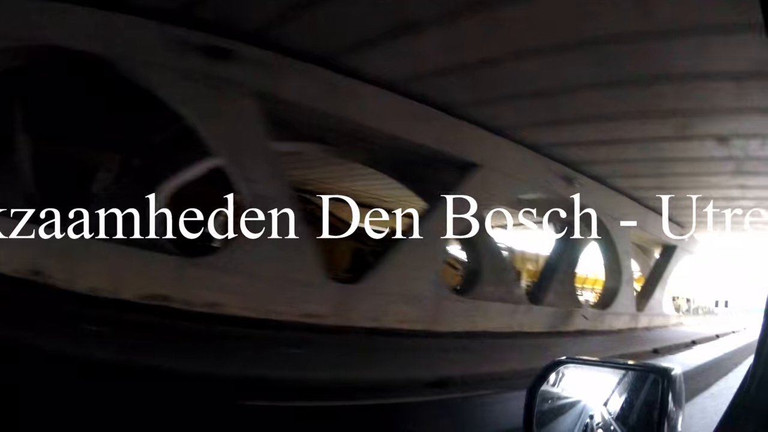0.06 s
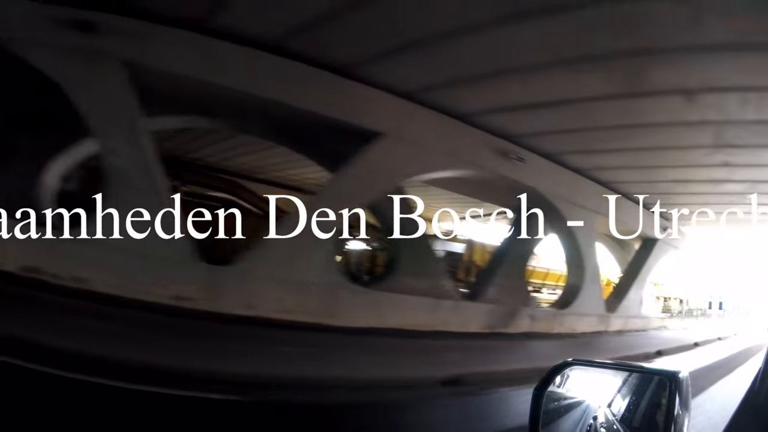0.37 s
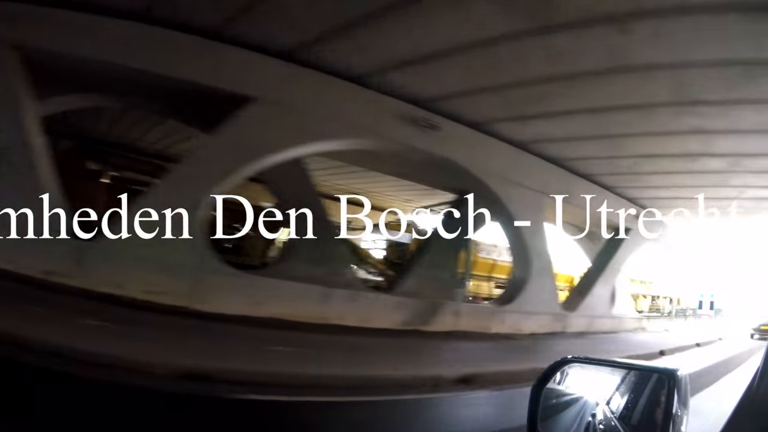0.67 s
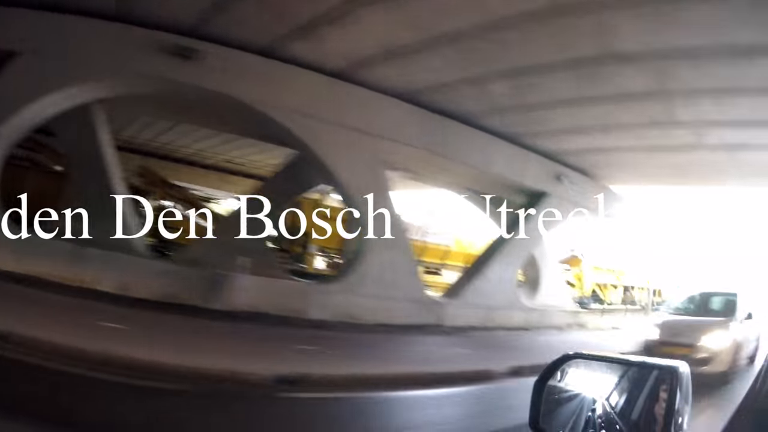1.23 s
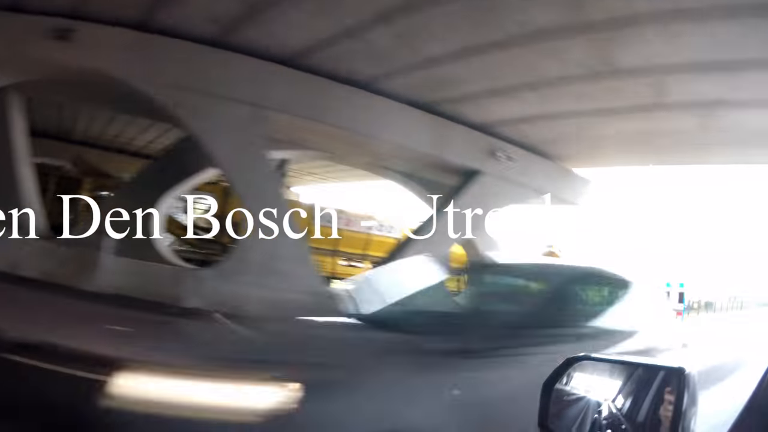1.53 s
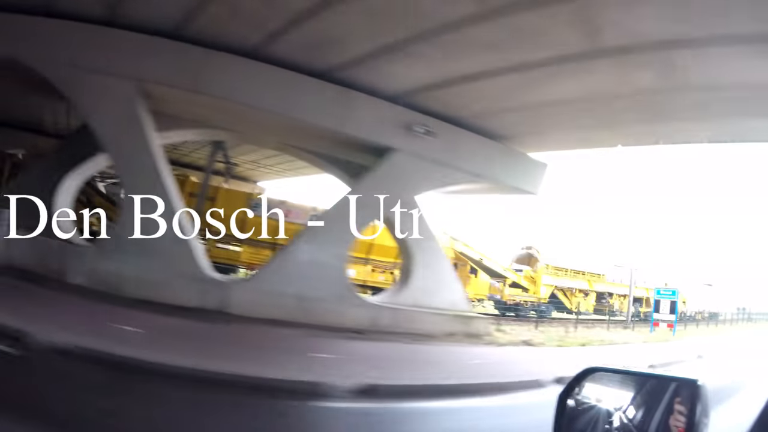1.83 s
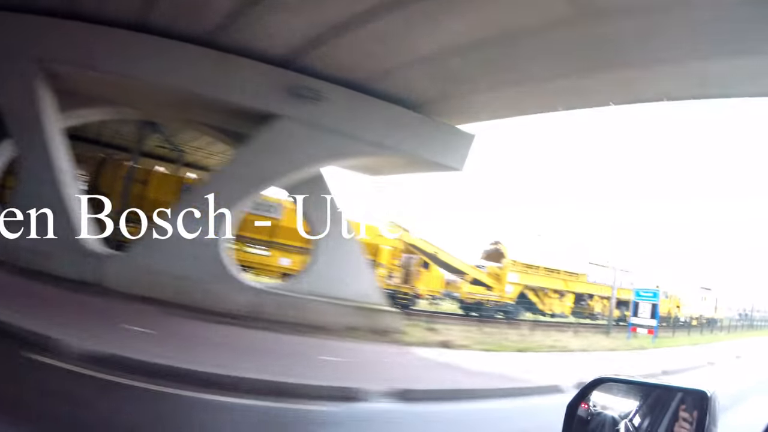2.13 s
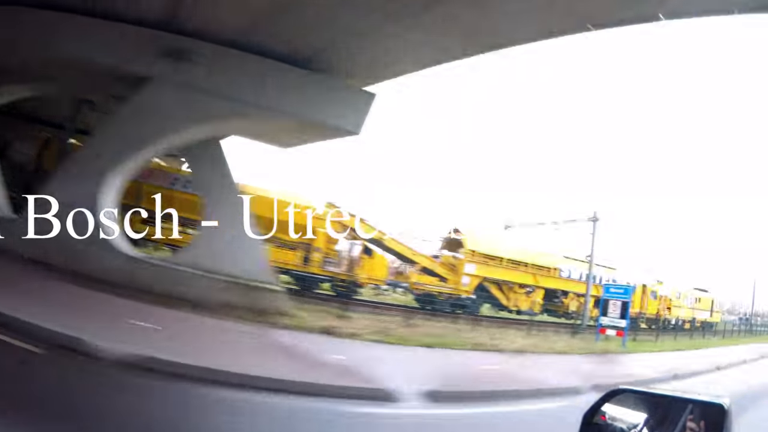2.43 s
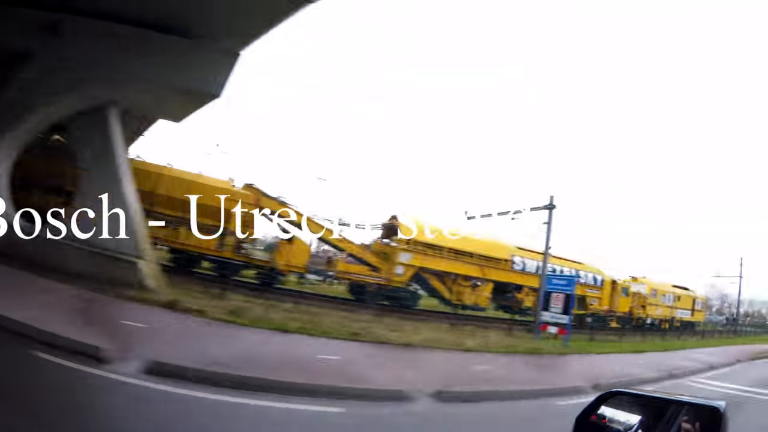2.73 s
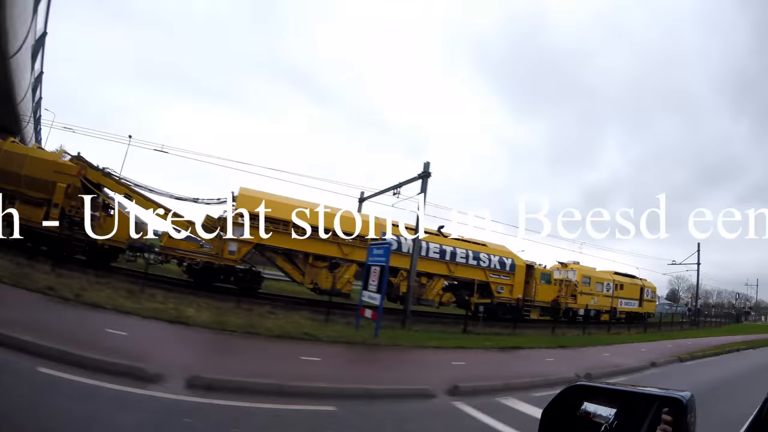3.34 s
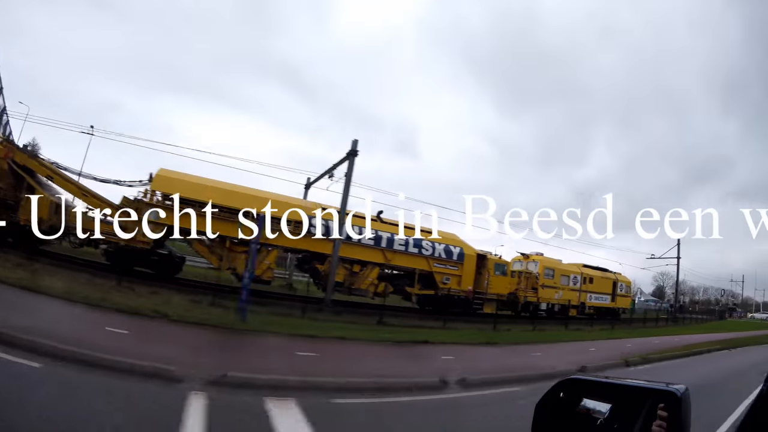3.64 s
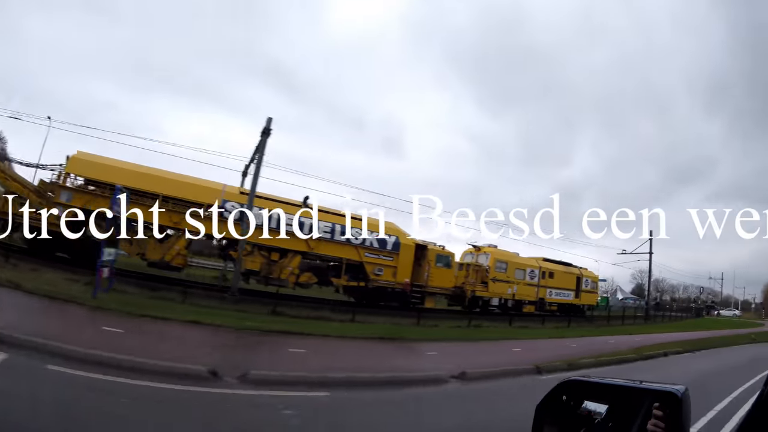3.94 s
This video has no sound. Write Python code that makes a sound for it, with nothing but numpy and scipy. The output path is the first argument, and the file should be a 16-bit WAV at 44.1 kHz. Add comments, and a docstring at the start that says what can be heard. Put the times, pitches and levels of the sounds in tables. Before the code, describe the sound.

Deep wind flutters on the microphone at a moving car's window, over tyre noise, low engine drone and a hollow roar under a bridge. At about 1.5 seconds an oncoming car whooshes past with a thump and a hiss of spray. Its wake pops and thumps until around 2.3 seconds. The roar falls away in the open, and wind, tyres and engine swell again from about 3.4 seconds.

```python
"""Driving out from under a bridge

At a car's side window, wind flutters on the microphone over tyre roar, air hiss and engine drone.
A concrete bridge throws the roar back until the car comes out into the open. An oncoming car
rushes past with a bow wave and a hiss of spray; the eddies of its wake thump and pop on the
microphone and push the limiter down."""
import sys
import numpy as np
from scipy import signal
from scipy.fft import rfft, irfft
from scipy.io import wavfile
from scipy.ndimage import uniform_filter1d, minimum_filter1d, map_coordinates

SR = 44100
rng = np.random.default_rng(int(sys.argv[2]) if len(sys.argv) > 2 else 0)


def master_out(mix):
    """Clip the mix to full scale and print it as 16-bit PCM to the path in sys.argv[1]."""
    frames = np.transpose(np.atleast_2d(mix))
    ceiling = np.clip(frames, -1, 1)
    pcm = np.round(ceiling * 32767).astype(np.int16)
    wavfile.write(sys.argv[1], SR, pcm)


N = 176400
T = np.arange(N) / SR
BURST_T = np.arange(-2048, 2048) / SR  # seconds around the centre of a short burst
PASS_S = 1.555  # the moment the oncoming car draws level


def amp(db):
    """Decibels to gain."""
    return 10 ** (np.asarray(db) / 20)


def unit(x):
    """Scales to rms 1."""
    return x / np.sqrt(np.mean(x ** 2) + 1e-20)


def level(points):
    """A fader ride: gain over time from rows of seconds and dB."""
    return amp(np.interp(T, *np.transpose(points)))


def colour(points, hz):
    """An EQ curve: gain at hz from rows of Hz and dB."""
    point_hz, db = np.transpose(points)
    return amp(np.interp(np.log(hz + 1), np.log(point_hz), db))


def noise(gain_at):
    """Noise of rms 1 with the given gain over frequency."""
    return unit(irfft(rfft(rng.standard_normal(N)) * gain_at(np.fft.rfftfreq(N, 1 / SR)), N))


def equalise(x, points):
    """Runs a sound through an EQ curve."""
    return irfft(rfft(x) * colour(points, np.fft.rfftfreq(N, 1 / SR)), N)


def rush(points, patchy_db, flicker_db):
    """Coloured noise with drifting patches and a flicker shared by all bands."""
    _, _, bands = signal.stft(rng.standard_normal(N), SR, nperseg=1024, noverlap=768)
    patches = uniform_filter1d(rng.standard_normal(bands.shape), size=8, axis=0)
    patches = unit(uniform_filter1d(patches, size=14, axis=1))
    flicker = unit(uniform_filter1d(rng.standard_normal(bands.shape[1]), size=5))
    bands *= amp(patchy_db * patches + flicker_db * flicker)
    _, restless = signal.istft(bands, nperseg=1024, noverlap=768)
    return unit(equalise(restless[:N], points))


def burst(window, gains):
    """A puff of noise under the window, evened out so that it fills its spectrum without holes."""
    puff = rng.standard_normal(len(window)) * window
    for _ in range(3):
        phases = np.exp(1j * np.angle(rfft(puff)))
        puff = irfft(phases * gains, len(window)) * np.sqrt(window)
    return unit(puff) * np.sqrt(np.mean(window ** 2))


def add(mix, centre_s, sound):
    """Mixes a sound in, centred on the given time."""
    part = mix[max(round(centre_s * SR) - len(sound) // 2, 0):][:len(sound)]
    part += sound[:len(part)]


# Gusts on the microphone. Each row: time in seconds, level in dB.
WIND_RIDE = [(0, -13.5), (.45, -11), (1.0, -12), (1.55, -11), (1.7, -14), (1.88, -7.5), (2.02, -16.5),
             (2.46, -16.5), (2.66, -19.5), (2.78, -19), (2.87, -27.5), (2.96, -16), (3.4, -16),
             (3.65, -12.5), (4, -14)]
# Their sub-heavy tone. Each row: frequency in Hz, gain in dB.
WIND_EQ = [(5, -9), (14, -2), (24, 4), (36, 0.5), (56, -8.5), (75, -15), (100, -22), (200, -39), (400, -57),
           (1500, -101.5)]


def wind(lull_s=1.622, lull_half_s=.05, lull_db=-12):
    """Deep airstream flutter, its big swings evened out; the passing car's body briefly shelters it."""
    flutter = noise(lambda hz: colour(WIND_EQ, hz))
    swing = uniform_filter1d(abs(signal.hilbert(flutter)), size=2600)
    shelter = amp(lull_db * np.exp(-((T - lull_s) / lull_half_s) ** 4))
    return level(WIND_RIDE) * shelter * unit(flutter / swing)


# Our own car's road noise. Each row: time in seconds, level in dB.
TYRE_RIDE = [(0, -28), (1.9, -33), (2.4, -39.5), (2.75, -36), (3.2, -33.5), (3.45, -30), (3.7, -28.5),
             (4, -27)]
# Its dark tone. Each row: frequency in Hz, gain in dB.
TYRE_EQ = [(40, 8), (130, 4), (220, 2), (330, -1.5), (500, -7.5), (780, -9), (1000, -7.5), (1220, -13),
           (1600, -13), (2200, -22.5), (3200, -29.5), (4300, -40), (6500, -44), (11000, -52.5),
           (15000, -61)]


def tyre_roar():
    """The car's own tyres and airflow, heard directly."""
    return level(TYRE_RIDE) * rush(TYRE_EQ, patchy_db=.5, flicker_db=.56)


# Air at the window. Each row: time in seconds, level in dB.
HISS_RIDE = [(0, -46.5), (.18, -46), (.45, -45), (1.05, -48.5), (1.6, -47.5), (1.87, -47), (2.0, -51.5),
             (2.17, -60.5), (2.42, -62.5), (2.52, -60), (2.66, -62), (3.0, -59), (3.6, -59), (4, -61.5)]
# Its thin, bright tone. Each row: frequency in Hz, gain in dB.
HISS_EQ = [(800, -20), (2600, 3.5), (4100, -2), (5000, 0), (6000, -8), (8000, -17.5), (10500, -26),
           (15000, -32.5)]


def window_hiss():
    """Air hissing along the side window."""
    return level(HISS_RIDE) * rush(HISS_EQ, patchy_db=.8, flicker_db=.3)


# The engine's swells. Each row: time in seconds, level in dB.
DRONE_RIDE = [(0, -25), (.35, -31.5), (.8, -32.5), (1.3, -40.5), (2.0, -40.5), (2.5, -38.5), (3.2, -52),
              (3.65, -27.5), (4, -38.5)]


def engine_drone(centre_hz=141, width_oct=.28):
    """The engine, blurred into one low band of noise."""
    drone = noise(lambda hz: np.exp(-.5 * (np.log2((hz + 1) / centre_hz) / width_oct) ** 2))
    return level(DRONE_RIDE) * drone


# Roar off the concrete, dying as we leave the bridge. Each row: time in seconds, level in dB.
BRIDGE_RIDE = [(0, -28), (.22, -27), (.55, -27), (.95, -28.5), (1.3, -27.5), (1.8, -29.5), (2.0, -39),
               (2.2, -45), (2.5, -54.5), (4, -72)]
# Its hollow tone. Each row: frequency in Hz, gain in dB.
BRIDGE_EQ = [(80, -4.5), (180, -1), (245, -9), (330, -1), (420, -5.5), (650, -3.5), (850, -6), (1000, -5.5),
             (1230, -9.5), (1450, -8), (2100, -17), (3000, -26.5), (4000, -36), (5000, -36.5),
             (6500, -38.5), (10500, -50.5), (15000, -59)]


def bridge_roar():
    """Diffuse traffic roar thrown back between the concrete deck and the road."""
    return level(BRIDGE_RIDE) * rush(BRIDGE_EQ, patchy_db=1.17, flicker_db=.3)


# Sharp pops of air. Each row: centre in seconds, level in dB, top of the knock in Hz.
AIR_POPS = [(0.102, -22, 2010), (1.559, -6, 690), (1.901, -16, 950), (1.905, -12, 1000), (1.918, -11, 1600),
            (1.973, -16, 1010), (1.984, -15.5, 1500), (2.167, -14, 530), (2.192, -25.5, 1200),
            (2.286, -20, 1400), (2.297, -25, 1400), (2.329, -18, 1550)]
# Their knocking tone. Each row: frequency in Hz, gain in dB.
POP_EQ = [(100, -11), (450, 4.5), (900, -6.5), (1500, -10.5), (5000, -17.5), (9000, -43.5)]


def pops(spread_s=.0019, fizz_db=-26.5):
    """Eddies break on the microphone port: knocks about one cycle long, with a faint fizz on top."""
    out = np.zeros(N)
    hz = np.fft.rfftfreq(len(BURST_T), 1 / SR)
    window = np.exp(-.5 * (BURST_T / spread_s) ** 2)
    for centre_s, db, top_hz in AIR_POPS:
        low_pass = 1 / np.sqrt(1 + (hz / top_hz) ** 14)
        knock = burst(window, colour(POP_EQ, hz) * (low_pass + amp(fizz_db)))
        add(out, centre_s, amp(db) * knock)
    return out


def bodywork_shadow(behind_s=2.12, fade_db_per_s=50):
    """Once the other car is far behind, the bodywork screens it off."""
    return amp(-fade_db_per_s * np.maximum(T - behind_s, 0))


# The tone of the oncoming tyres. Each row: frequency in Hz, gain in dB.
PASS_EQ = [(60, -16.5), (150, -8), (230, -4), (400, -4.5), (650, -3.5), (850, -2.5), (1100, -3),
           (1450, -1.5), (2100, -9.5), (3000, -15), (4100, -21.5), (5300, -25), (7500, -34), (10500, -42),
           (15000, -50)]


def oncoming_car(level_db=-25, closing_m_per_s=33, gap_m=3.02, tread_hz=1600, tread_width_hz=90):
    """Tyre rush and a singing tread swell, drop in pitch and fade as the other car goes by."""
    along_m = closing_m_per_s * (T - PASS_S)
    distance_m = np.hypot(gap_m, along_m)
    facing = -along_m / distance_m
    beam_db = .5 * facing ** 2 + 1.4 * facing  # tyres throw sound along the road, most of all ahead
    gain = amp(level_db + beam_db) * (gap_m / distance_m) ** 1.56
    tread = amp(-10) * noise(lambda hz: 1 / (1 + (2 * (hz - tread_hz) / tread_width_hz) ** 2))
    tyres = rush(PASS_EQ, patchy_db=.9, flicker_db=.4) + tread
    sent_s = T - distance_m / 343  # the changing travel time bends the pitch
    return gain * bodywork_shadow() * map_coordinates(tyres, [sent_s * SR], order=3, mode="wrap")


# The bow wave's dull tone. Each row: frequency in Hz, gain in dB.
BOW_EQ = [(60, -5), (160, 5.5), (330, -2.5), (680, 1.5), (1100, -11), (4000, -60)]


def bow_wave(level_db=-23.5, rise_db_per_s=48, fall_db_per_s=900):
    """Air pushed ahead of the other car: a rush that builds, then cuts as its nose goes by."""
    below_peak_db = np.maximum(rise_db_per_s * (PASS_S - T), fall_db_per_s * (T - PASS_S))
    return amp(level_db - below_peak_db) * noise(lambda hz: colour(BOW_EQ, hz))


# The spray's sizzle. Each row: frequency in Hz, gain in dB.
SPRAY_EQ = [(800, -24), (2500, 0.5), (5500, 3.5), (8000, -6.5), (15000, -25)]


def spray(front_s=1.525, front_db=-46, rear_s=1.655, rear_db=-48, half_length_s=.081):
    """Hiss thrown off the damp road by the other car's front wheel, then its rear wheel."""
    front = amp(front_db) / (1 + ((T - front_s) / half_length_s) ** 2)
    rear = amp(rear_db) / (1 + ((T - rear_s) / half_length_s) ** 2)
    return (front + rear) * bodywork_shadow() * noise(lambda hz: colour(SPRAY_EQ, hz))


# Thumps in the other car's wake. Each row: centre in seconds, suction in dB, turbulence in dB,
# turbulence spread in seconds, turbulence corner in Hz.
WAKE_EDDIES = [(1.5646, 5.5, 1, 0.0048, 210), (1.905, -24, 1.5, 0.0049, 211), (1.919, -7, -6.5, 0.013, 225),
               (1.980, -2, -13.5, 0.014, 251), (2.077, -11.5, -30, 0.0028, 220),
               (2.172, -5.5, -13, 0.0066, 288), (2.192, -10.5, -15.5, 0.008, 217),
               (2.289, -3.5, -18.5, 0.018, 260), (2.327, -10.5, -19, 0.015, 257),
               (2.666, -11.5, -26.5, 0.019, 127)]


def wake(core_s=.0048, rise_ratio=.79, rolloff_order=3.1):
    """Each eddy is a dip in pressure wrapped in turbulence that rises faster than it dies."""
    out = np.zeros(N)
    hz = np.fft.rfftfreq(len(BURST_T), 1 / SR)
    across_core = BURST_T / core_s
    suction = (across_core ** 2 - 1) * np.exp(-across_core ** 2 / 2)
    skew = np.where(BURST_T < 0, rise_ratio, 1)
    for centre_s, suction_db, turbulence_db, spread_s, corner_hz in WAKE_EDDIES:
        window = np.exp(-.5 * (BURST_T / spread_s / skew) ** 2)
        high_pass = hz / (hz + corner_hz / 2)
        low_pass = 1 / np.sqrt(1 + (hz / corner_hz) ** (2 * rolloff_order))
        turbulence = burst(window, high_pass * low_pass)
        add(out, centre_s, amp(suction_db) * suction + amp(turbulence_db) * turbulence)
    return out


# The tick's bright tone. Each row: frequency in Hz, gain in dB.
TICK_EQ = [(1000, -22), (4500, 0), (14000, -9)]


def tick(centre_s=3.578, db=-51, spread_s=.0008):
    """One faint, bright tick, perhaps a bit of grit."""
    window = np.exp(-.5 * ((T - centre_s) / spread_s) ** 2)
    return amp(db) * window * noise(lambda hz: colour(TICK_EQ, hz))


# The highest treble is dulled above about 11 kHz. Each row: frequency in Hz, gain in dB.
TREBLE_SHELF_EQ = [(10800, 0), (11800, -8), (15000, -16.5)]


def scene():
    """All layers mixed to mono, with the highest treble dulled."""
    bed = wind() + tyre_roar() + window_hiss() + engine_drone() + bridge_roar()
    events = oncoming_car() + bow_wave() + wake() + pops() + spray() + tick()
    return equalise(bed + events, TREBLE_SHELF_EQ)[None]


def record(dry, threshold_db=-1.5, attack_s=.0015, recovery_db_per_s=118, fade_s=.004, top_hz=14900):
    """A limiter ducks fast and recovers steadily; soft clipping, edge fades and a high cut follow."""
    span = 2 * int(attack_s * SR)
    envelope_db = 20 * np.log10(uniform_filter1d(abs(dry[0]), span) + 1e-9)
    over_db = np.maximum(envelope_db - threshold_db, 0)
    recovery_db = T * recovery_db_per_s
    reduction_db = np.maximum.accumulate(over_db + recovery_db) - recovery_db
    ducked = dry * amp(uniform_filter1d(minimum_filter1d(-reduction_db, span), span))
    clipped = ducked / (1 + (ducked / .96) ** 6) ** (1 / 6)  # rounds off peaks that slip through
    edge_s = np.minimum(T, T[::-1])
    fade = np.sin(np.pi / 2 * np.minimum(edge_s / fade_s, 1)) ** 2
    low_pass = signal.firwin(511, top_hz, window=("kaiser", 9), fs=SR)
    return signal.oaconvolve(clipped * fade, low_pass[None], "same")


dry = scene()
out = record(dry)
master_out(out)
```